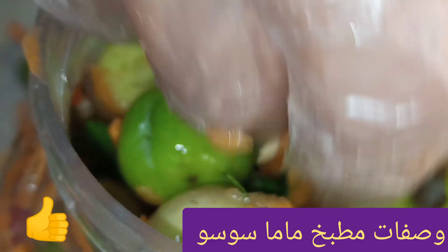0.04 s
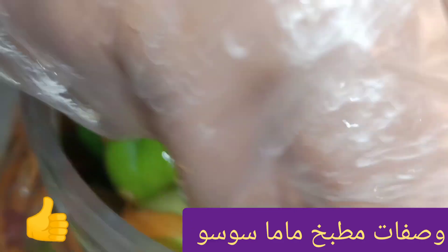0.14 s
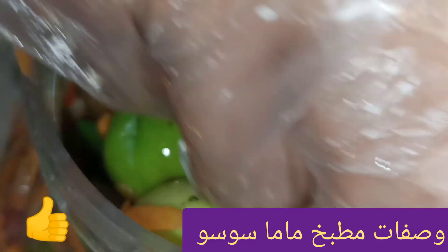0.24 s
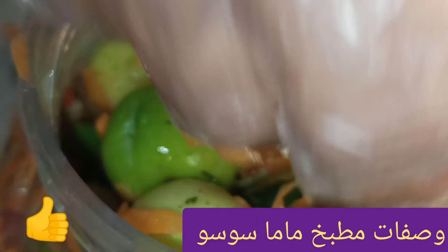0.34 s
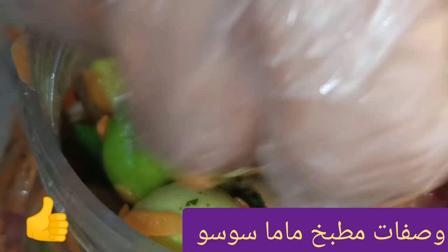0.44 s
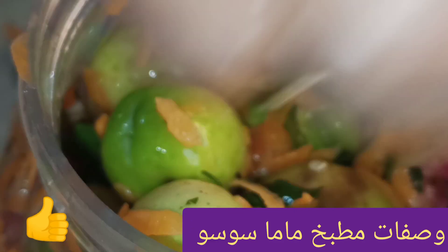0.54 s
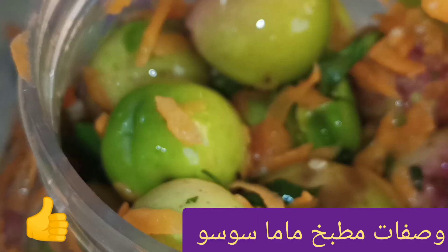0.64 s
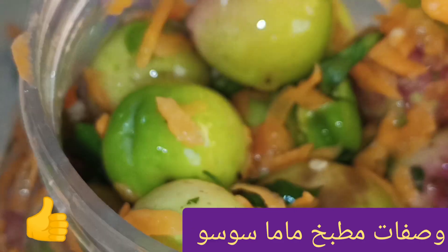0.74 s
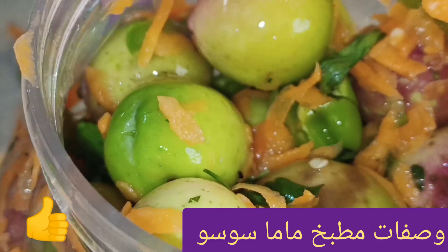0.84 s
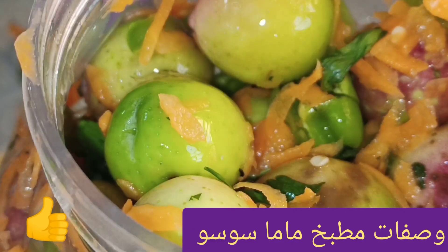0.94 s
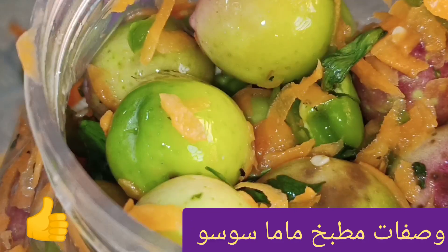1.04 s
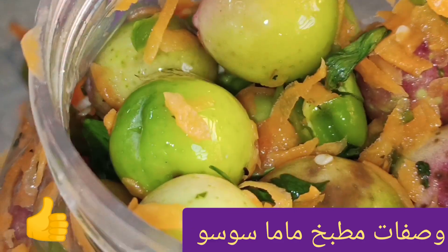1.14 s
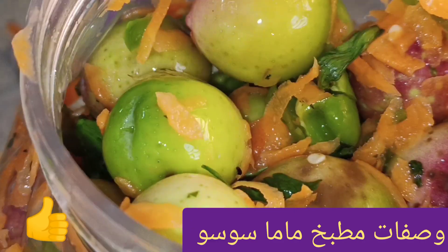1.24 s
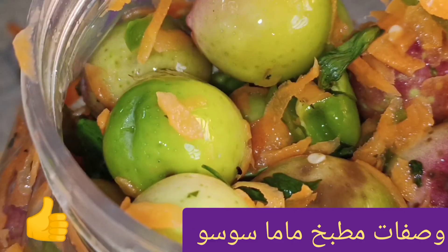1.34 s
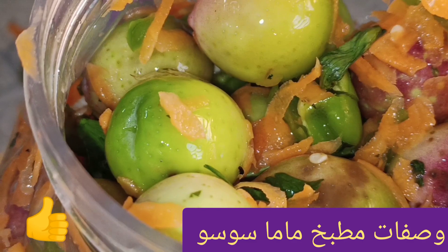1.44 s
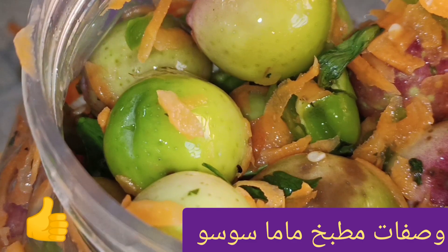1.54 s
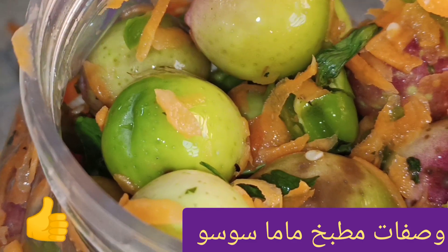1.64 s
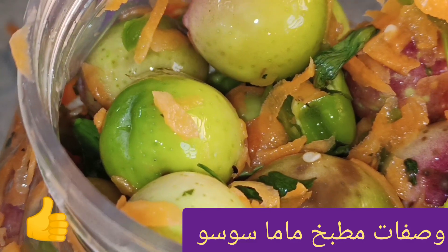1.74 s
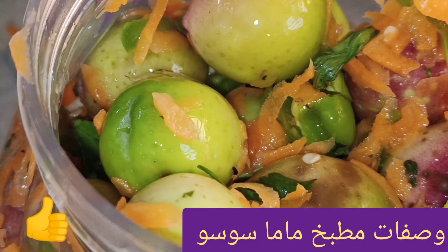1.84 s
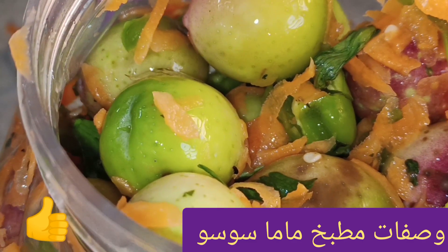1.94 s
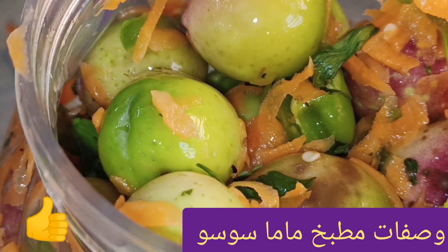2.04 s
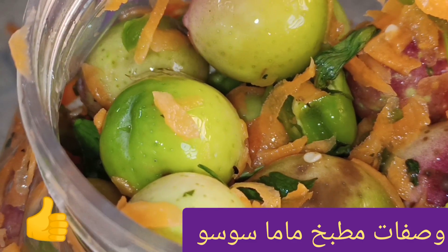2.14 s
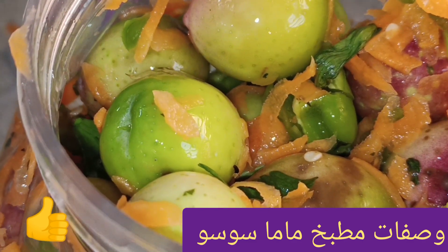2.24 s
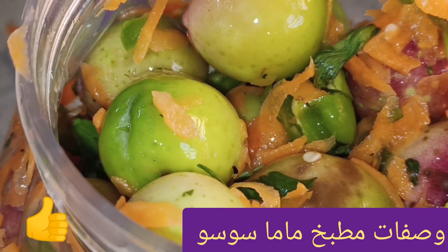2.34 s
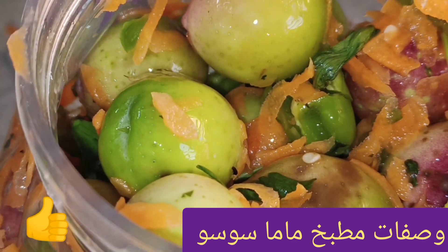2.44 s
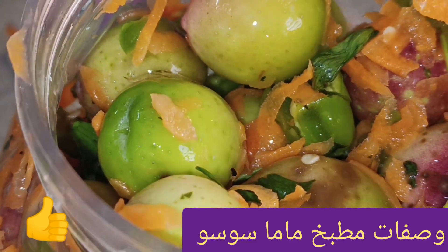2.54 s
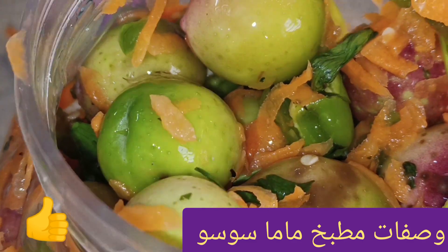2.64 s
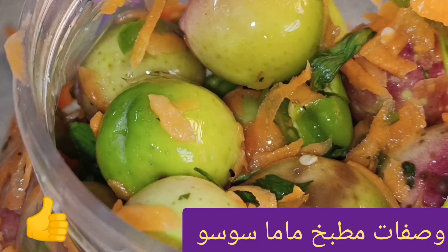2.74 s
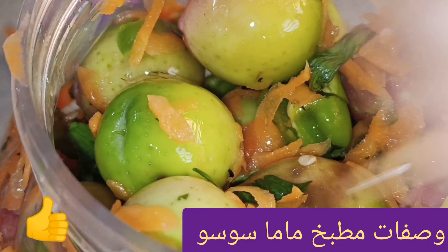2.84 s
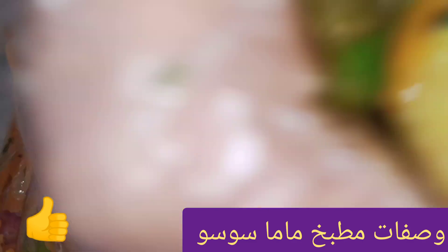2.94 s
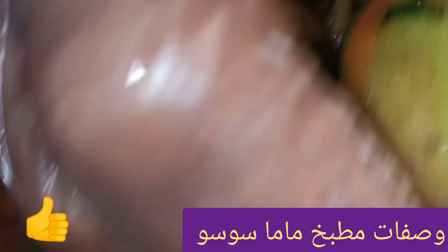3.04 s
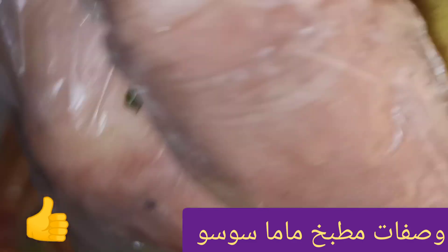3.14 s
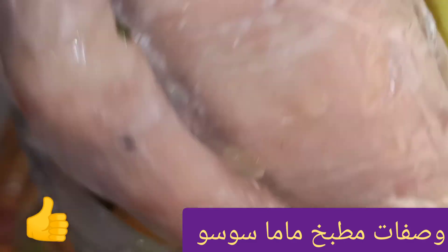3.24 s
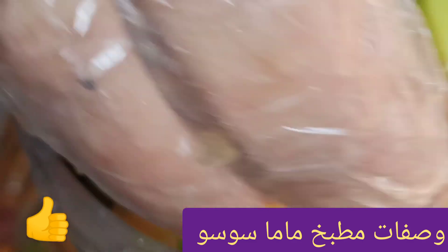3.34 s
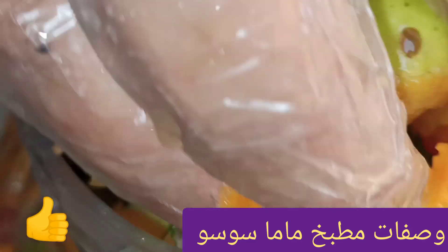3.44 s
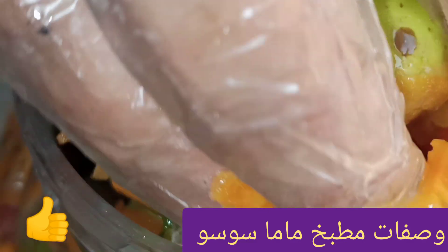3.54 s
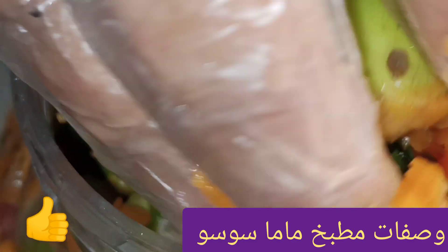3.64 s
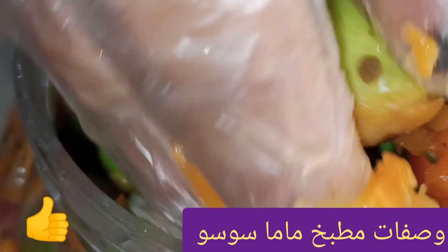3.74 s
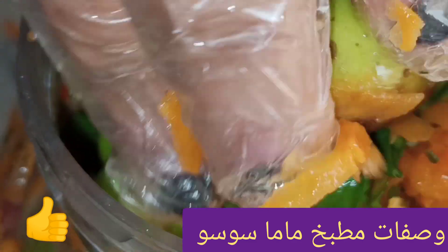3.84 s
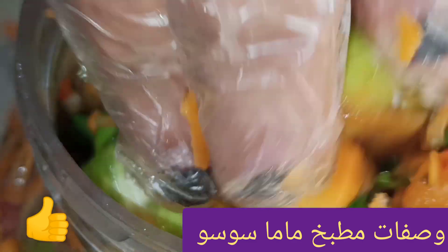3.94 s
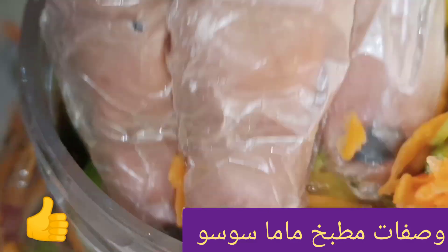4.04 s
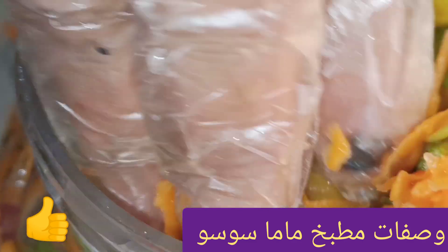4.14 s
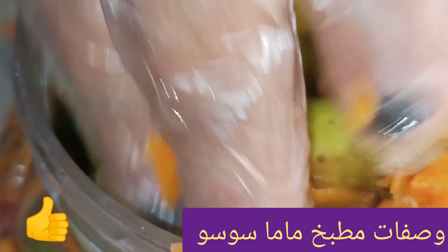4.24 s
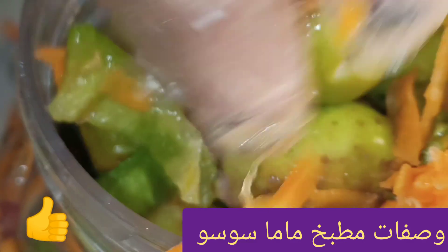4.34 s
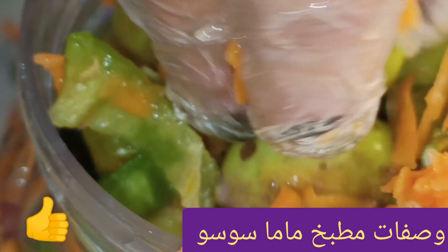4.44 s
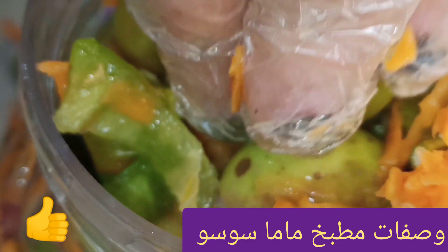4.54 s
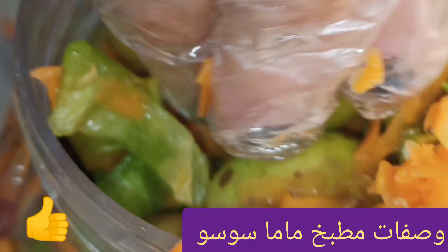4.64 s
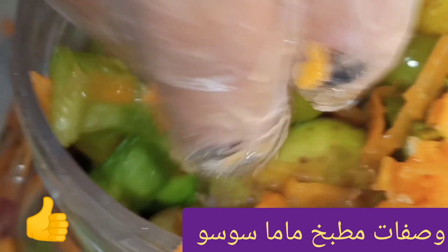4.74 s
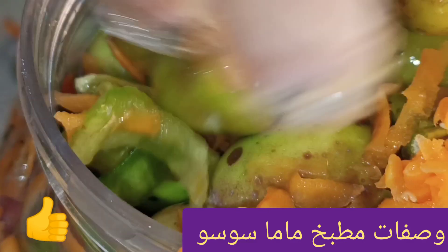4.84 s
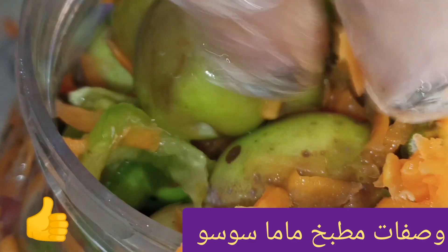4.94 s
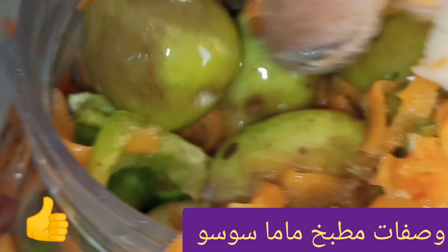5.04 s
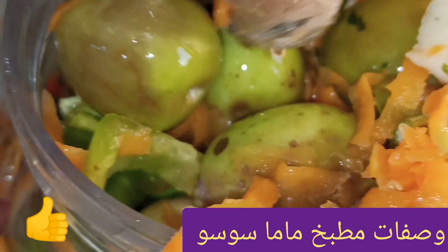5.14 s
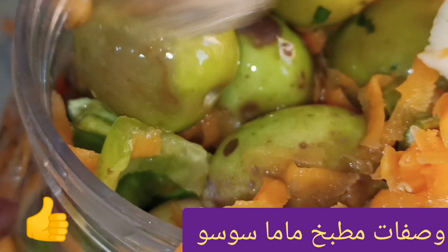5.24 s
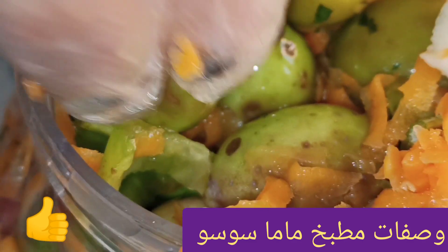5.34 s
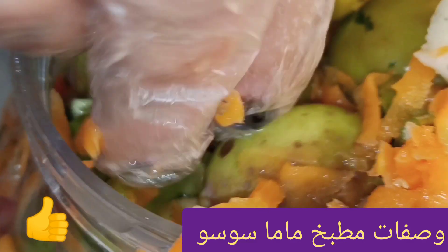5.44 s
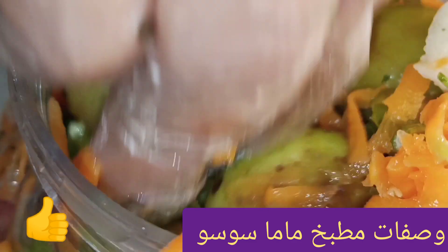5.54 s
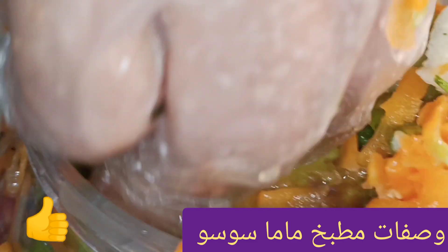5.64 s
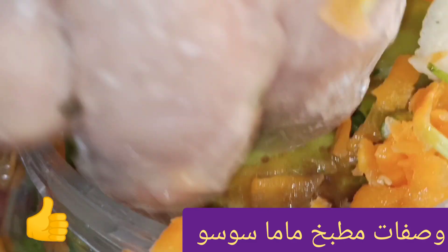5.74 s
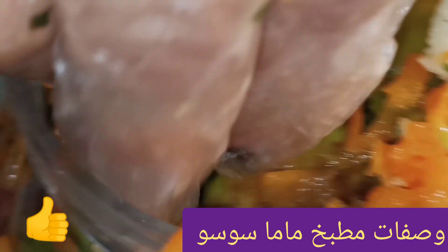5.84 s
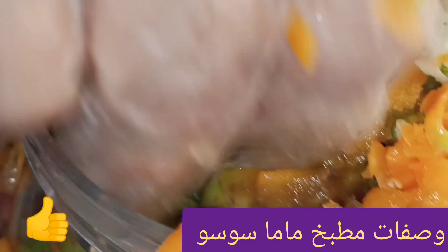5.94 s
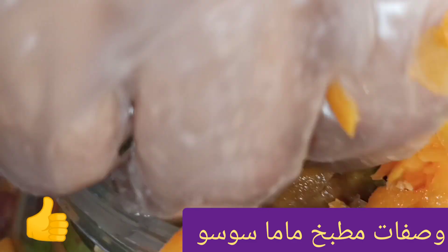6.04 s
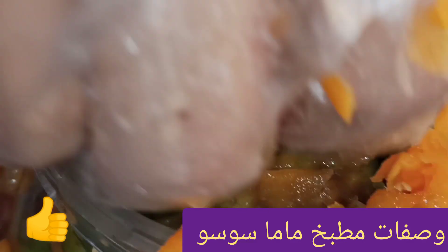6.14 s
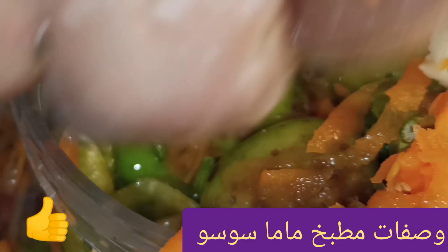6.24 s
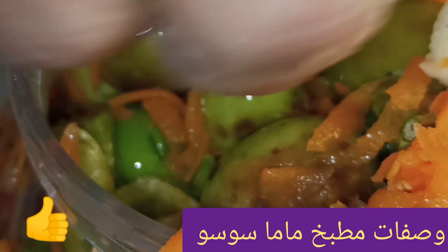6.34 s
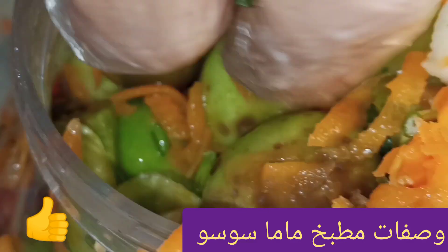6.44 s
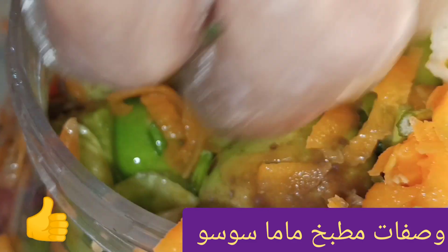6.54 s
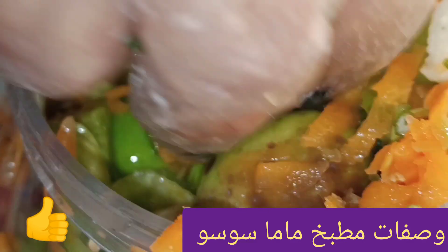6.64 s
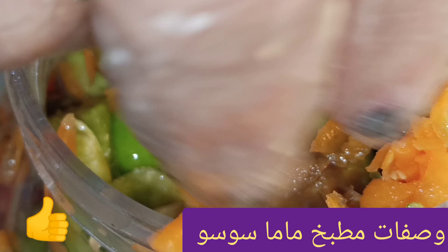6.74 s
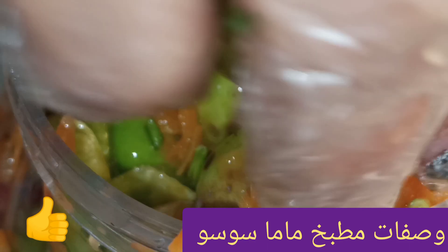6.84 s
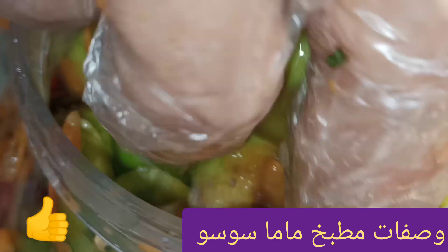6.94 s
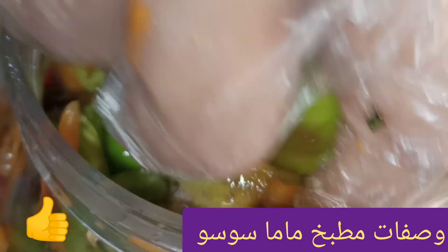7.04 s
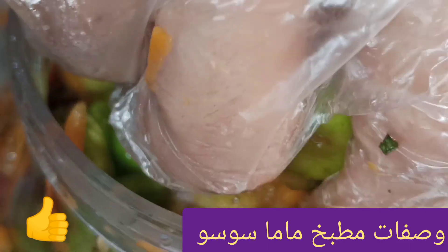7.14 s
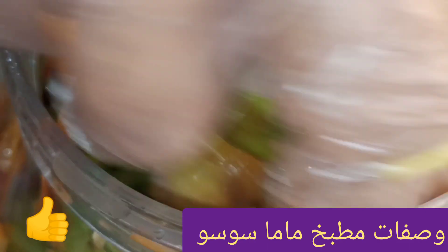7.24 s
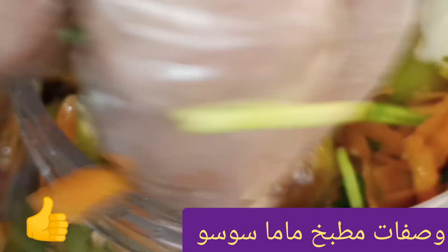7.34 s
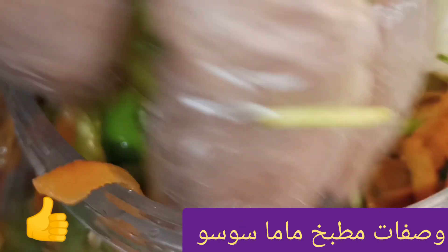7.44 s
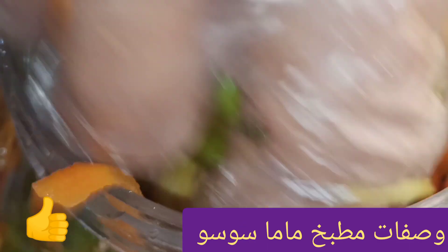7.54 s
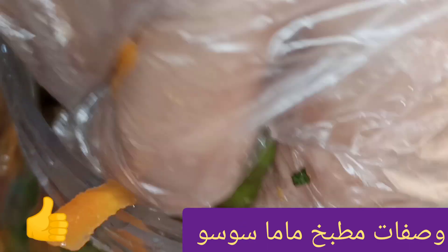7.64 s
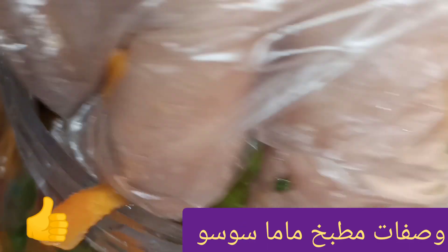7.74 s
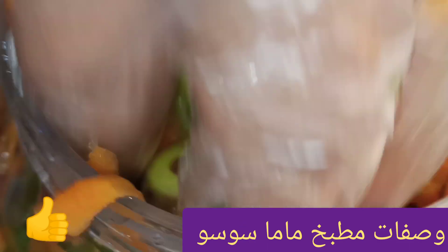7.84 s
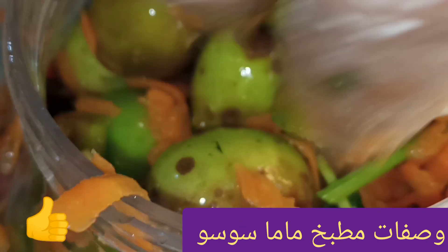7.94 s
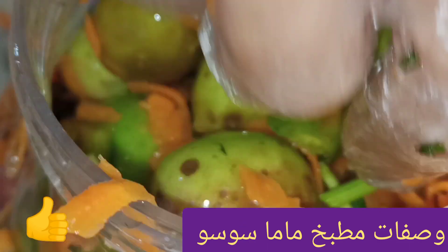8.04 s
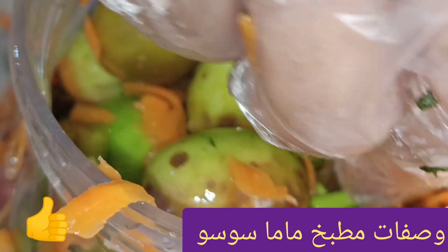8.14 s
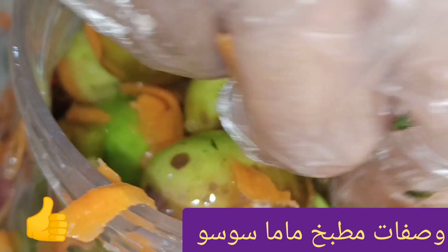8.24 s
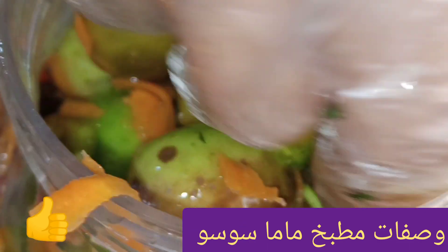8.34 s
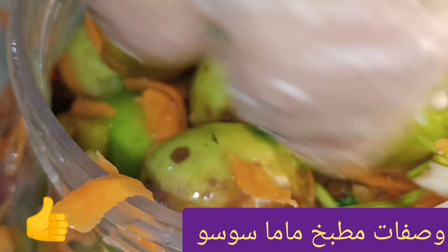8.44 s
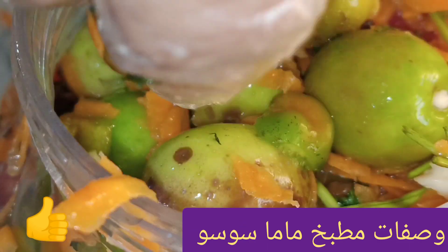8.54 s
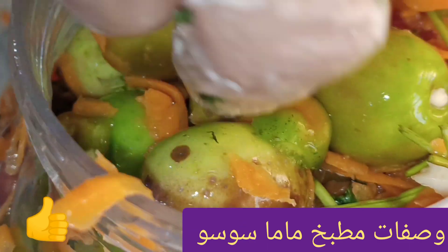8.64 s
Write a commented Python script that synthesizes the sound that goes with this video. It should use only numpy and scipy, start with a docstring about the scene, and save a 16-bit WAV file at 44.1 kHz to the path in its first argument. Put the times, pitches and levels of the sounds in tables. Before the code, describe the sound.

Very close to a phone microphone in a quiet kitchen, a thin plastic glove crackles as fingers push wet vegetables into a jar. The hand lifts away and the film rubs on itself in finer, denser rustle with a few bumps and a hard tap, fading to sparse ticks. Then crunchy crinkling returns abruptly and continues in irregular bursts with sharp snaps, faint squelches and a dull pop.

```python
"""Gloved hand packing a jar

A hand in a thin plastic glove presses vegetables into a glass jar, close to a phone in a quiet kitchen.
The film buckles in showers of tiny shaped noise bursts, with larger snaps; while the hand is lifted away
the film rubs on itself in finer, denser bursts. Wet vegetables rumble and squelch as filtered noise,
bump and pop as short sine pulses; hard taps ring as decaying modes. Faint air noise and hum lie behind.
"""
import sys
import numpy as np
from scipy import signal
from scipy.fft import rfft, irfft
from scipy.io import wavfile
from scipy.ndimage import uniform_filter1d

SR = 44100
rng = np.random.default_rng(int(sys.argv[2]) if len(sys.argv) > 2 else 0)


def generate_wav(signal):
    """Clip the signal to [-1, 1] and save it as 16-bit WAV at the path in sys.argv[1]."""
    frames = np.transpose(np.atleast_2d(signal))
    scaled = np.clip(frames, -1, 1) * 32767
    pcm = np.round(scaled).astype(np.int16)
    wavfile.write(sys.argv[1], SR, pcm)


N = 383669

# long slide of film over film: t/s, level/dB
SLIDE = [(0.85, -50), (0.891, -37.5), (1.1, -35), (1.48, -36.5), (1.73, -28.5), (2.07, -33), (2.11, -38.5),
         (2.46, -43), (2.572, -52), (2.72, -53.5), (2.83, -49.5), (2.901, -77)]
# spectrum of the buckling film: f/Hz, level/dB
CRINKLE_COLOUR = [(300, -40), (900, -35.5), (1700, -24.5), (2400, -26), (3250, -21.5), (4150, -8),
                  (4800, -3), (5900, -3), (7400, -0.5), (8200, 4.5), (9800, -12.5), (12200, -17.5),
                  (13800, -13.5), (15500, -14.5)]
# spectrum of film rubbing on film: f/Hz, level/dB
RUB_COLOUR = [(300, -21), (1200, -13.5), (2010, -17), (2900, -5.5), (5000, -4.5), (6680, -8.5), (8300, 3.5),
              (10300, -8.5), (11600, -10.5), (12700, -8), (13800, -3), (15500, -1)]
# spectrum of wet slips and tap scrapes: f/Hz, level/dB
SQUELCH_COLOUR = [(300, -22), (520, -7), (650, 1), (920, -4), (1130, -5.5), (1400, -6.5), (1750, -2.5),
                  (2300, -6), (3000, -2), (5000, -12)]

HAND_OUT_S, LEAVE_S = 0.78, 0.074  # hand leaves the jar: centre, fade
HAND_IN_S, RETURN_S = 2.98, 0.0136  # hand comes back: centre, fade
REST_S, REST_FADE_S = 2.84, 0.013  # load fades to near stillness until the hand is back
USUAL_DB = -32  # reference glove level
TOP_HZ = 15500  # upper band edge


def grip():
    """Flexes add power to the slack glove's rustle, each with its own crunch: (level dB, crunch dB)."""
    # finger flexes: t/s, hold/s, level/dB, extra low crunch/dB
    flexes = [(0, 0.0084, -29.5, -4), (0.089, 0.044, -31, 3.5), (0.234, 0.0035, -26.0, 5),
              (0.328, 0.25, -34.0, 3), (0.644, 0.011, -31, 7), (3.091, 0.34, -34, 9),
              (3.482, 0.33, -36.5, 6.5), (3.848, 0.079, -29.5, 5.5), (3.943, 0.17, -31.0, 6.5),
              (4.175, 0.077, -34, 8), (4.29, 0.047, -28.5, 5), (4.389, 0.046, -24.5, 4),
              (4.495, 0.11, -26.5, 2), (4.706, 0.017, -31, -1), (4.786, 0.11, -34.5, 6.5),
              (4.948, 0.003, -25.5, 3), (5.014, 0.072, -27.5, 2), (5.124, 0.11, -33.5, 4),
              (5.324, 0.18, -32.5, 6), (5.51, 0.046, -25.5, 4), (5.606, 0.144, -31.5, 10),
              (5.81, 0.17, -31.5, 10), (6.027, 0.042, -26.5, 4), (6.134, 0.1, -30.5, 2),
              (6.312, 0.0067, -32, 5), (6.383, 0.11, -31.5, 3), (6.618, 0.053, -36.5, 5),
              (6.734, 0.069, -38, -6), (6.909, 0.16, -32.0, 1), (7.121, 0.034, -27, 2),
              (7.32, 0.097, -34.0, 1), (7.399, 0.004, -26.0, -1), (7.492, 0.089, -31.5, 3),
              (7.622, 0.11, -33, 5.5), (7.853, 0.16, -32.5, 4), (8.093, 0.0074, -27, 4),
              (8.174, 0.069, -32.5, 4.5), (8.324, 0.21, -37, -0.5)]
    slack_db, slack_crunch_db = -44.5, 5.5  # glove between flexes
    power = undb(slack_db) ** 2
    weighted_crunch = power * slack_crunch_db
    for start_s, hold_s, db, crunch_db in flexes:
        flex = swell(start_s, hold_s, db)
        power = power + flex
        weighted_crunch = weighted_crunch + flex * crunch_db
    grip_db = 10 * np.log10(power * pause(HAND_OUT_S, LEAVE_S) ** 2)
    return grip_db, weighted_crunch / power


def crinkle(grip_db, crunch_db):
    """Flexing folds the film; creases buckle in avalanches, broad folds adding crunch and sizzle."""
    sizzle_per_crunch = 0.24  # dB per dB
    top_fade_db_per_s = 0.04  # top dulls as the hand works deeper into the jar
    times_s, db, decay_s, facet = shower(0, (N - 1) / SR, count=8500, spread_db=2.6,
                                         facet_db=5.5, decay_s=0.00072)
    at = (times_s * SR).astype(int)
    crunch_at_db = crunch_db[at]
    sizzle_db = sizzle_per_crunch * crunch_at_db
    sizzle_db = sizzle_db - top_fade_db_per_s * np.maximum(times_s - HAND_IN_S, 0)

    def gains(hz):
        low = np.interp(hz, [3300, 4600], [1, 0])
        top = np.interp(hz, [8600, 11500], [0, 1])
        fold_gain = undb(crunch_at_db[:, None] * low + sizzle_db[:, None] * top)
        return response(CRINKLE_COLOUR, hz) * tilt(hz, facet) * fold_gain

    happens = giving_way(grip_db[at], busy_db=-42)
    db = np.where(happens, db + 2.3 * walk(110)[at], -np.inf)
    film = buckles(times_s, db, decay_s, gains)
    return even(film, 0.027) * undb(grip_db - 0.76)


def sliding():
    """Rubbing level in dB: one long slide plus the power of quicker strokes."""
    # quicker strokes within the rubbing: t/s, hold/s, level/dB
    strokes = [(1.158, 0.011, -28.5), (1.222, 0.014, -26.5), (1.301, 0.014, -24), (1.591, 0.011, -23.5),
               (1.923, .025, -35.5)]
    slide_db = np.interp(np.arange(N) / SR, *np.transpose(SLIDE), left=-100, right=-100)
    stroke_power = sum(swell(*row) for row in strokes)
    return 10 * np.log10(undb(slide_db) ** 2 + stroke_power)


def rub(rub_db):
    """Sliding film catches in dense, small slips that thin out to sparse, duller ticks."""
    dulling = 0.12  # dB per octave for each dB: slower sliding sounds duller
    times_s, db, decay_s, facet = shower(SLIDE[0][0], SLIDE[-1][0], count=4500, spread_db=1.5,
                                         facet_db=-1.0, decay_s=0.00073)
    speed_db = rub_db[(times_s * SR).astype(int)]
    db = np.where(giving_way(speed_db, busy_db=-37.5), db, -np.inf)
    bright = facet + dulling * (speed_db - USUAL_DB)
    film = buckles(times_s, db, decay_s, lambda hz: response(RUB_COLOUR, hz) * tilt(hz, bright))
    flutter = undb(1.7 * walk(80))
    return even(film * flutter, 0.07) * undb(rub_db - 1.24)


def snaps(grip_db):
    """Large creases flip at once, lesser ones at random; out of the jar they take the rubbing colour."""
    # largest creases: t/s, level/dB, brightness/(dB per octave)
    creases = [(0.2465, -19, 1), (0.2517, -17, 1), (0.3878, -20, 1), (0.7486, -32, 1), (0.7651, -24, 3),
               (0.8249, -32, 3), (0.8678, -24, 3), (0.8894, -19, 7), (1.1605, -21, 3), (2.4389, -28, 4),
               (2.4664, -30, 5), (2.4818, -27, 4), (2.535, -30, 4), (2.5554, -35, 6), (2.6, -29, -4),
               (2.6097, -27, -5), (2.6401, -36, 6), (2.6699, -34, 1), (2.7102, -30, -3), (2.7161, -32, -3),
               (2.7881, -31, 1), (2.7942, -25, -1), (2.9866, -31, 0), (2.9975, -32, 1), (3.3413, -22, -3),
               (3.6922, -20, 2), (3.9422, -14, -2), (4.0291, -17, -2), (4.1854, -18, 1), (4.35, -15, 0),
               (4.3858, -15, 0), (4.4206, -17, 2), (4.5878, -16, -2), (5.1669, -19, 0), (5.3338, -17, 1),
               (5.4301, -13, 1), (5.5294, -17, -1), (5.8276, -18, 2), (6.0044, -15, -1), (6.0303, -19, -2),
               (6.052, -13, -2), (6.1669, -16, 1), (6.229, -18, 0), (6.3654, -22, -2), (6.8985, -17, 0),
               (6.9081, -19, -2), (7.2858, -23, -2), (7.4048, -13, 0), (7.9932, -18, 0), (8.1693, -23, 0)]
    crease_decay_s, stray_decay_s = 0.00055, 0.00032
    stray_over_db = 5  # lesser snaps over the grip level
    when_s, over_db, stray_s, facet = shower(0, (N - 1) / SR, count=330, spread_db=1.1,
                                             facet_db=0.5, decay_s=stray_decay_s)
    stray_db = grip_db[(when_s * SR).astype(int)] + stray_over_db + over_db
    strays = np.column_stack([when_s, stray_db, facet])
    times_s, db, bright = np.vstack([creases, strays]).T
    decay_s = np.concatenate([np.full(len(creases), crease_decay_s), stray_s])
    lifted = (times_s > SLIDE[0][0] + 2 * LEAVE_S) & (times_s < REST_S)

    def gains(hz):
        film = np.where(lifted[:, None], response(RUB_COLOUR, hz), response(CRINKLE_COLOUR, hz))
        low_cut = undb(np.interp(hz, [2200, 3200], [-9, 0]))
        return film * tilt(hz, bright) * low_cut

    return buckles(times_s, db, decay_s, gains)


def vegetables(effort_db):
    """The shifting load rumbles and wet skins slip in ticks that ring the jar; both follow effort."""
    # shoves that shift the whole load: t/s, hold/s, rumble level/dB
    shoves = [(0.239, 0.027, -38.5), (1.173, 0.16, -43), (1.389, 0.041, -42), (1.652, 0.11, -41),
              (3.12, 0.23, -45), (4.4, .02, -46), (6.416, 0.072, -49), (7.143, 0.034, -40)]
    # rumble spectrum: f/Hz, level/dB
    rumble_colour = [(25, -30), (45, -6.5), (62, -10), (98, 1.5), (125, -3.5), (175, -4), (225, 0),
                     (330, -6), (440, -9), (800, -22)]
    rumble_db, rumble_follow = -50.5, 0.11  # at usual effort; dB per dB of effort
    squelch_db, squelch_follow = -50, 0.46
    shove_squelch_db = -6.5  # against the shove's rumble
    rumble = colour(rng.standard_normal(N) * undb(1.57 * walk(45)), rumble_colour)
    slips = rng.standard_normal(N) * undb(2.9 * walk(220))
    squelch = colour(slips, SQUELCH_COLOUR)
    shove = np.sqrt(sum(swell(*row) for row in shoves))
    rumble_gain = np.hypot(undb(rumble_db + rumble_follow * effort_db), shove)
    shove_squelch = shove * undb(shove_squelch_db)
    squelch_gain = np.hypot(undb(squelch_db + squelch_follow * effort_db), shove_squelch)
    return (rumble * rumble_gain + squelch * squelch_gain) * pause(REST_S, REST_FADE_S)


def knocks():
    """Impacts in sum: soft bumps, hard taps and a dull pop."""
    return bumps() + taps() + pop()


def bumps():
    """Soft bumps: sines that swell and fade symmetrically under a sech envelope."""
    # soft bumps: t/s, peak level/dB, f/Hz, swell time/s
    bump_rows = [(0.29, -33, 118, 0.013), (0.307, -32, 258, 0.0029), (1.235, -35, 184, 0.006),
                 (1.305, -34, 111, 0.015), (1.604, -29.5, 102, 0.011), (1.668, -25, 190, 0.0025),
                 (1.678, -33.5, 214, 0.026), (1.749, -23, 290, 0.001), (4.422, -38.5, 220, .005),
                 (4.885, -46, 607, 0.0062), (5.624, -30.5, 318, 0.0013), (5.939, -35, 257, 0.0029),
                 (6.245, -37, 330, 0.0063), (6.413, -41, 327, 0.014), (6.493, -37.5, 323, 0.0097),
                 (7.147, -25, 223, .005)]
    t, out = np.arange(N) / SR, np.zeros(N)
    for start_s, db, hz, swell_s in bump_rows:
        near = np.abs(t - start_s) < 6 * swell_s
        age_s = t[near] - start_s
        envelope = 1 / np.cosh(np.pi / 2 * age_s / swell_s)
        out[near] += undb(db) * np.sin(2 * np.pi * hz * age_s) * envelope
    return out


def taps():
    """Hard taps: decaying modes, peak-normalised together, plus a short noise scrape."""
    # hard taps: t/s, ring peak level/dB
    tap_rows = [(0.2477, -32), (1.696, -20), (7.7805, -36.5)]
    # ringing modes: f/Hz, relative level/dB, t60/s
    modes = [(657, 7.5, 0.12), (1120, 14, 0.05), (1590, 11.5, 0.066), (1890, -33, 0.03), (2730, -20, .02)]
    out = np.zeros(N)
    age_s = np.arange(SR // 5) / SR
    ring = sum(undb(db - 60 * age_s / t60_s) * np.sin(2 * np.pi * hz * age_s)
               for hz, db, t60_s in modes)
    ring = ring / np.abs(ring).max()
    grit = colour(rng.standard_normal(N), SQUELCH_COLOUR)
    for start_s, db in tap_rows:
        at = int(start_s * SR)
        scrape = undb(-4.5) * grit[at:][:len(age_s)] * np.exp(-age_s / 0.0074)
        out[at:][:len(age_s)] += undb(db) * (ring + scrape)
    return out


def pop():
    """Dull pop under the fingers: an inverted cosine with a very fast onset and exponential decay."""
    # pop: t/s, level before envelope/dB, f/Hz, decay/s
    pop_rows = [(5.8888, -18, 122, 0.0024)]
    out = np.zeros(N)
    age_s = np.arange(SR // 5) / SR
    for start_s, db, hz, decay_s in pop_rows:
        onset = (1 - np.exp(-age_s / 0.000084)) ** 2
        fade = np.exp(-age_s / decay_s) * onset
        out[int(start_s * SR):][:len(age_s)] -= undb(db) * fade * np.cos(2 * np.pi * hz * age_s)
    return out


def kitchen():
    """Faint coloured air noise and a steady-level appliance hum with wavering phase."""
    # air noise spectrum: f/Hz, level/dB
    air_colour = [(25, -32), (100, -1.5), (260, -8.5), (600, -13.5), (1200, -16), (2100, -26), (3200, -17),
                  (8000, -26), (11500, -29), (15400, -42)]
    # appliance hum: f/Hz, rms level/dB
    hum_tones = [(100, -64.5), (247, -66), (491, -66.5)]
    t = np.arange(N) / SR
    hum = sum(np.sqrt(2) * undb(db) * np.sin(2 * np.pi * hz * t + 0.5 * walk(6.5))
              for hz, db in hum_tones)
    return hum + undb(-60.5) * colour(rng.standard_normal(N), air_colour)


def room(x, wet_db, t60_s):
    """Short, weak reflections from jar, worktop and walls: convolution with decaying noise."""
    t = np.arange(SR // 2) / SR
    tail = rng.standard_normal(len(t)) * undb(-60 * t / t60_s) * (t > 0.002)
    tail = tail / np.linalg.norm(tail)
    return x + undb(wet_db) * signal.fftconvolve(x, tail)[:N]


def shower(start_s, end_s, count, spread_db, facet_db, decay_s):
    """Random buckles, most tiny, few large: (times s, level dB, decay s, brightness dB per octave)."""
    when, size, ring, facet = rng.random((count, 4)).T
    times_s = start_s + (end_s - start_s) * when
    db = -spread_db * np.log(size + 0.015)
    return times_s, db, decay_s * 2 ** (2 * ring - 1), facet_db * (2 * facet - 1)


def giving_way(level_db, busy_db):
    """Which buckles happen: all in a busy film, fewer as the hand slows, down to 7 percent."""
    return rng.random(len(level_db)) < np.maximum(undb(1.5 * (level_db - busy_db)), 0.07)


def buckles(times_s, db, decay_s, gains, size=384):
    """Each buckle shakes the film for about a millisecond; gains(hz) colours it, db is rms over 1 ms."""
    lead = 24  # samples ahead of the onset, for filter pre-ringing
    age = np.maximum(np.arange(size) - lead, 0) / SR / decay_s[:, None]
    shape = age * np.exp(-age)  # flip gathers speed, then dies away
    hz = np.fft.rfftfreq(size, 1 / SR)
    spectra = rfft(shape * rng.standard_normal((len(times_s), size)))
    bursts = irfft(spectra * gains(hz) * (hz < TOP_HZ), size)
    unit_gain = np.sqrt(SR / 1000 / np.sum(bursts ** 2, axis=1))
    bursts *= (undb(db) * unit_gain)[:, None]
    places = (np.maximum(times_s, 0) * SR).astype(int)[:, None] + np.arange(size)
    return np.bincount(places.ravel(), bursts.ravel(), N + size)[lead:N + lead]


def tilt(hz, db_per_octave):
    """Gain tilt about 8 kHz, flat below 3.2 kHz: positive brightness lifts the top, negative dulls it."""
    return undb(db_per_octave[:, None] * np.log2(np.maximum(hz, 3200) / 8000))


def swell(start_s, hold_s, db):
    """Power of one hand movement: exponential rise, hold, exponential fall."""
    rise_s, fall_s = 0.025, 0.026  # amplitude time constants
    age_s = np.arange(N) / SR - start_s
    log_gain = np.minimum(age_s, 0) / rise_s - np.maximum(age_s - hold_s, 0) / fall_s
    return undb(db) ** 2 * np.exp(2 * np.maximum(log_gain, -20))


def pause(start_s, fade_s):
    """Gain that falls at start_s and recovers as the hand comes back."""
    still_db = -28.5  # remaining level while at rest
    t = np.arange(N) / SR
    leaving = (1 + np.tanh((t - start_s) / fade_s / 2)) / 2
    not_back = (1 + np.tanh((HAND_IN_S - t) / RETURN_S / 2)) / 2
    return 1 - leaving * not_back * (1 - undb(still_db))


def walk(rate_hz):
    """Random level joining rate_hz random knots per second by straight lines; spread near 1."""
    knots = rng.standard_normal(4096)
    return 1.2 * np.interp(np.arange(N) / SR * rate_hz, np.arange(len(knots)), knots)


def even(x, span_s):
    """Hold the running rms near 1, leaving the quick grain alone."""
    span = int(span_s * SR)
    power = uniform_filter1d(uniform_filter1d(x * x, span), span)
    return x / np.sqrt(np.abs(power) + 1e-4 * np.mean(x * x))  # floor spares silence


def colour(x, points):
    """Filter by a (f/Hz, level/dB) spectrum; scale to rms 1."""
    y = irfft(rfft(x) * response(points, np.fft.rfftfreq(N, 1 / SR)), N)
    return y / y.std()


def response(points, hz):
    """Gain of a (f/Hz, level/dB) spectrum, interpolated over log frequency."""
    f, db = np.transpose(points)
    return undb(np.interp(np.log(hz + 1), np.log(f), db))


def undb(db):
    """Decibels to amplitude gain."""
    return 10 ** (np.asarray(db) / 20)


def scene():
    """Close sources with reflections, plus the kitchen; one microphone, same in both channels."""
    grip_db, crunch_db = grip()
    rub_db = sliding()
    hand_gain = np.hypot(undb(grip_db), undb(rub_db))
    effort_db = 20 * np.log10(hand_gain) - USUAL_DB
    film = crinkle(grip_db, crunch_db) + rub(rub_db) + snaps(grip_db)
    close = film + vegetables(effort_db) + knocks()
    mono = room(close, wet_db=-16, t60_s=0.08) + kitchen()
    return np.array([mono, mono])


def record(dry):
    """The microphone port resonates at the very top; the phone cuts steeply above the band edge."""
    port_hz, port_width_hz = 15300, 900
    port = signal.lfilter(*signal.iirpeak(port_hz, port_hz / port_width_hz, fs=SR), dry)
    low_pass = signal.ellip(12, 0.2, 70, TOP_HZ, fs=SR, output="sos")
    return signal.sosfilt(low_pass, dry + undb(3) * port)


dry = scene()
out = record(dry)
generate_wav(out)
```